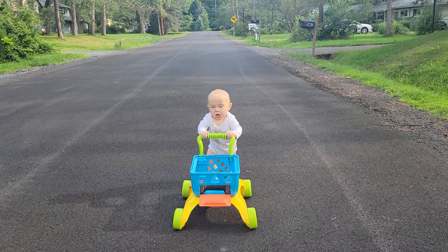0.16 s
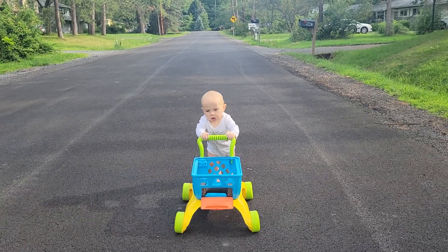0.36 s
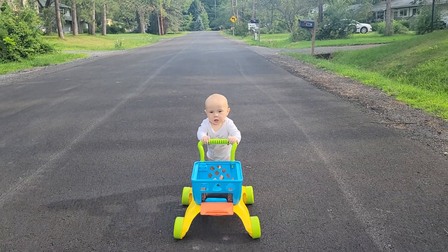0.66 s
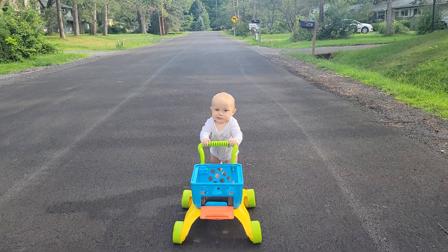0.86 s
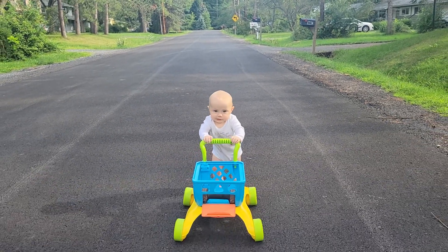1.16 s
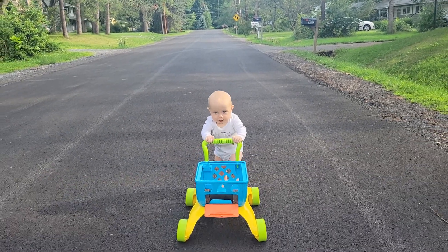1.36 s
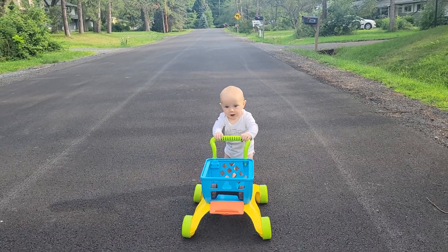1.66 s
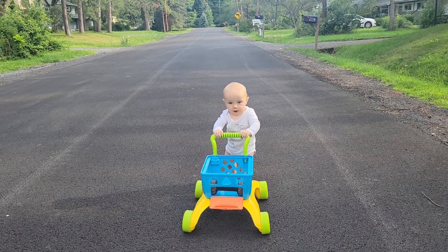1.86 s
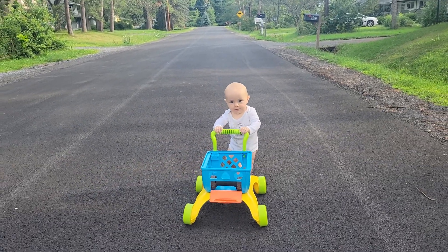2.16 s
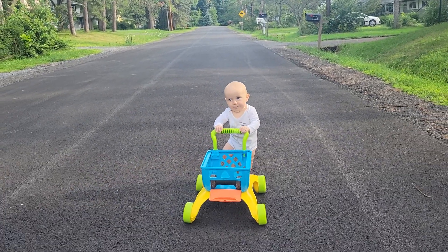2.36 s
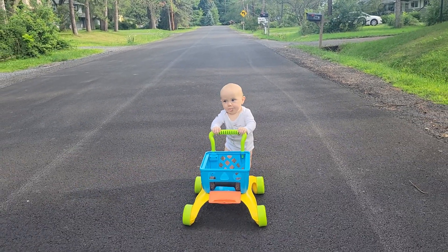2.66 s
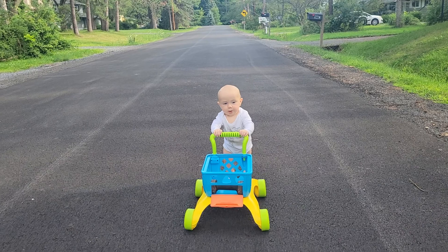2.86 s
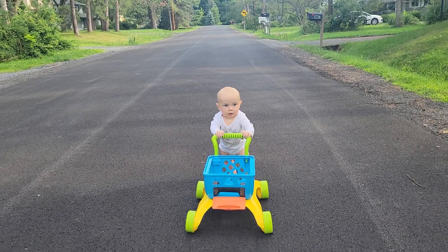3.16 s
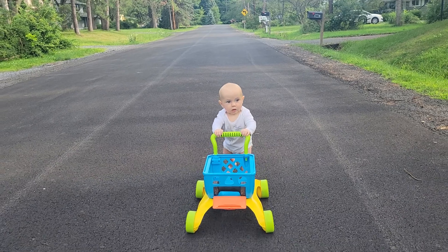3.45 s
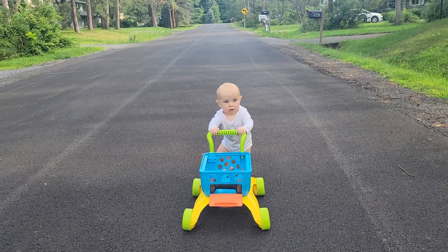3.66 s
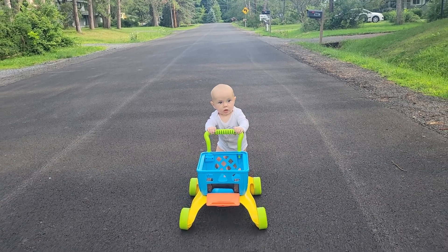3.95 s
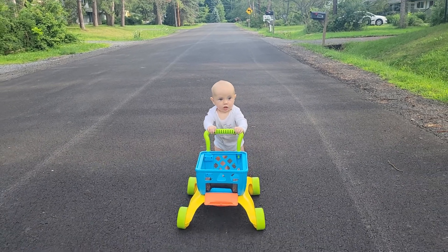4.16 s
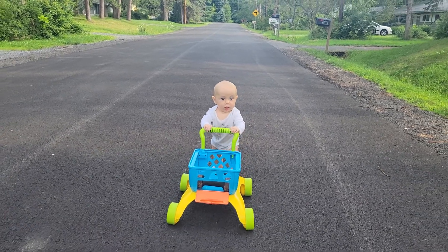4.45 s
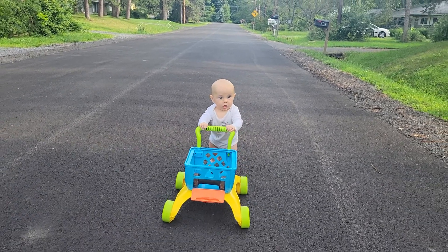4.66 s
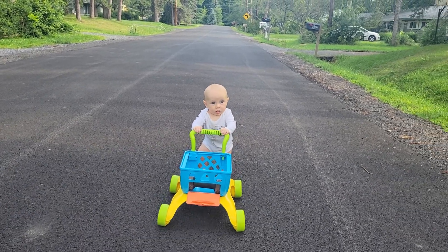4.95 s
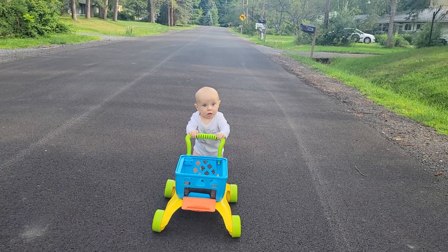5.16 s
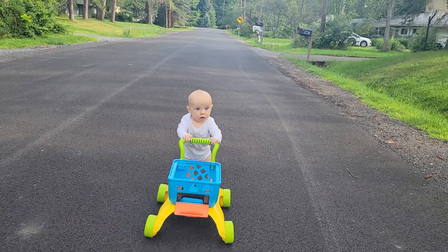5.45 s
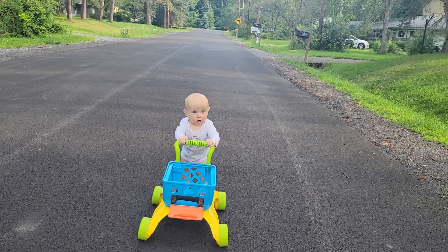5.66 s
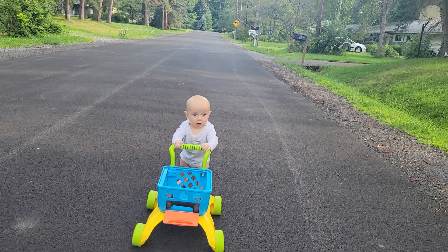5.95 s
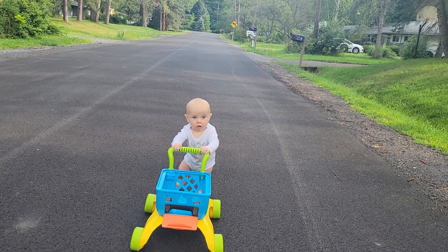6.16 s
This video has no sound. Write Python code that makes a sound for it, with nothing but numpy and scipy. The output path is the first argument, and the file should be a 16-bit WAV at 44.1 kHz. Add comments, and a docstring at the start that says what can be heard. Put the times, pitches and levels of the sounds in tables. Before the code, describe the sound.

Open air on a quiet residential street, stereo microphone near the cart. From 0 s a hollow plastic push cart rattles over coarse asphalt, with knocks clustered up to 0.8 s, the strongest at 0.75, and a deep hollow boom near 1.3. High pulsing crickets are clearest in the first second, then drop to a faint shimmer. A distant one-cylinder engine putters, surges at about 1.1 s, settles, swells again near 2.9 and falls to a slow chug at 3.3. Gritty sole scuffs come between 1.2 and 2.6 s, with a soft low thump at 2.2. Knocks return at 2.7, then crowd from 3.8 to 4.7 with crisp grit cracks and another soft thump. Scuffs follow at 4.2, 5.0 and 5.3. From 4.6 s the engine revs higher, becoming a strong low drone, loudest at the 6.3 s end, over sparse final rattles and low airy rumble.

```python
"""A hollow plastic push cart rolls over coarse asphalt: random impacts of grit and sharp blows excite its modes.
Some way off a one-cylinder engine putters and revs up, a harmonic series locked to the firing rate, with one echo.
Crickets trill in the verges as pulsed gliding tones, the far ones merged into bands of hiss; filtered noise is
the air of a quiet street. Grit cracks in treble bursts, soles scuff in gritty hiss, and soft thumps swing low."""
import sys
import numpy as np
from scipy import signal
from scipy.fft import rfft, irfft
from scipy.io import wavfile
from scipy.ndimage import uniform_filter1d

SR = 44100
rng = np.random.default_rng(int(sys.argv[2]) if len(sys.argv) > 2 else 0)


def wav_out(sig):
    """Save sig, one row per channel (or a flat mono array), as 16-bit PCM at SR to the path in sys.argv[1]."""
    wavfile.write(sys.argv[1], SR, np.round(np.clip(np.atleast_2d(sig).T, -1, 1) * 32767).astype(np.int16))


N = 278315


def gain_of(db):
    """Level law: amplitude ratio of a level in dB."""
    return 10 ** (np.asarray(db) / 20)


def evened(x):
    """Normalisation to unit root-mean-square."""
    return x / np.sqrt(np.mean(x ** 2) + 1e-20)


def read(points, hz):
    """Interpolation of a spectrum table on a logarithmic frequency axis."""
    f, value = np.transpose(points)
    return np.interp(np.log(hz + 1), np.log(f + 1), value)


def curves(rows):
    """Linear interpolation in time: every column of a table at sample rate."""
    s, *columns = np.transpose(rows)
    return [np.interp(np.arange(N) / SR, s, c) for c in columns]


def add(mix, s, sound):
    """Superposition: a sound joins the mix at s seconds, cut at the end of the mix."""
    part = mix[..., round(s * SR):][..., :sound.shape[-1]]
    part += sound[..., :part.shape[-1]]


def sides(db):
    """Interchannel level difference: left over right by db."""
    return gain_of([[db / 2], [-db / 2]])


def ring(x, hz, width):
    """Simple resonance: two poles, peak gain 1."""
    return signal.lfilter(*signal.iirpeak(hz, hz / width, SR), x)


# Modes of the hollow plastic cart: f/Hz, width/Hz, level/dB
CART_MODES = [(372, 130, -9), (443, 150, -9), (725, 63, -8), (798, 60, -1), (1066, 99, -4),
              (1657, 126, -12), (2330, 430, -22), (3530, 240, -27.5), (4900, 960, -22.5),
              (13100, 1100, -40.5)]


def cart(blows, fine, vary_db=0):
    """Modal superposition: broad blows excite the five low modes, fine ones the high modes."""
    modes = 0
    for k, (hz, width, db) in enumerate(CART_MODES):
        force = fine if k > 4 else blows
        # each impact favours other modes when vary_db is above 0
        favour = gain_of(vary_db * rng.standard_normal(blows.shape[1]))
        modes = modes + (-1) ** k * gain_of(db) * ring(force * favour, hz, width)
    return signal.lfilter(*signal.butter(2, 250, "high", fs=SR), modes, axis=1)


def spread(wheels):
    """Crosstalk by path difference: each wheel reaches the other microphone one sample later and duller."""
    far = signal.lfilter(*signal.butter(1, 3500, fs=SR), wheels[::-1])
    return (wheels + np.roll(far, 1, axis=1)) * sides(-1.6)


# Rattle of the wheels: t/s, level/dB
RATTLE_LEVEL = [(0.0, -59.5), (0.33, -43), (0.52, -56), (0.78, -41), (1.03, -56), (1.28, -40.5),
                (1.39, -62.5), (1.6, -43.5), (1.83, -79), (2.6, -49), (3.28, -54.5), (3.39, -44.5),
                (3.5, -60.5), (4.0, -50), (4.3, -55.5), (5.4, -63.5), (5.7, -50.5), (5.96, -60),
                (6.19, -50), (6.31, -72)]


def rattle(shake_db=-18, rise_s=0.004, fall_s=0.03):
    """Addition of powers: the run of the cart plus a short shake at every bump, shake_db relative to its blow."""
    t = np.arange(N) / SR
    power = gain_of(curves(RATTLE_LEVEL)[0]) ** 2
    for s, db, *_ in BUMPS:
        envelope_log = np.minimum((t - s) / rise_s, (s - t) / fall_s)
        power += gain_of(db + shake_db) ** 2 * np.exp(envelope_log * 2)
    return np.sqrt(power)


# Boom of the hollow basket, as gains on its resonances: t/s, upper note level/dB, deep note level/dB
BASKET_BOOM = [(.4, -0.5, -33), (.6, 7, -26.5), (1.27, 3.5, 3.5), (1.4, 6.5, -10), (2.1, -3, -24)]


def rolling(jolt_db=2.8, vary_db=4, impacts_per_s=1200):
    """Random impact excitation: stones and grit of uneven size tick two wheels apart, in shared jolts."""
    jolts = evened(uniform_filter1d(uniform_filter1d(rng.standard_normal(N), size=300), size=300))
    shape = (2, 2, N)  # stones and grit, left and right wheel, samples
    size_db = 3.6 * np.minimum(rng.exponential(1, shape), 4)
    size = gain_of(size_db) * rng.standard_normal(shape)
    landed = rng.random(shape) < impacts_per_s / SR
    stones, grit = size * landed * gain_of(jolt_db * jolts)
    upper, deep = gain_of(curves(BASKET_BOOM))
    upper_note = upper * ring(ring(stones, 670, 90), 670, 90)
    deep_note = deep * ring(stones, 345, 25)
    wheels = cart(stones, grit, vary_db)
    # the rattle level holds for the wheels alone; the basket comes on top
    return spread(wheels + upper_note + deep_note) * rattle() / np.std(spread(wheels))


# Engine speed: t/s, firing rate f/Hz, mean level/dB
ENGINE_RUN = [(0.0, 35.4, -44.5), (0.84, 29.4, -41.5), (1.1, 35.0, -31), (1.26, 39.2, -32),
              (1.65, 33.6, -37), (1.88, 30.1, -39.5), (2.64, 28.9, -39), (2.93, 32.6, -32),
              (3.12, 29.0, -34.5), (3.3, 24.5, -40), (3.7, 25.5, -38), (4.38, 25.7, -33.5),
              (4.63, 27.6, -35), (5.0, 38.7, -26), (5.2, 44.4, -26), (5.42, 48.6, -25.5), (5.9, 46.5, -24),
              (6.19, 55.8, -23), (6.31, 58.4, -20)]
# Exhaust response: f/Hz, relative level/dB
EXHAUST_RESPONSE = [(20, -41), (48, -17), (78, 0), (105, 2), (145, 1), (190, -10.5), (221, -19.5),
                    (243, -14), (290, -36), (400, -52)]
# Bark of the exhaust, a tilt about 120 Hz: t/s, slope/(dB per octave)
EXHAUST_BARK = [(0, 4), (.85, 2), (2.3, -2), (3.4, -3), (4.5, -8.5), (5.3, 0.5)]


def engine(uneven_db=1.3, jitter=.009, skew=.4):
    """Fourier synthesis: equal-phase orders make one pressure pulse a firing, of uneven strength and period."""
    # computed at an eighth of the sample rate
    hz, level_db, bark = (c[::8] for c in curves(ENGINE_RUN) + curves(EXHAUST_BARK))
    wobble = evened(uniform_filter1d(rng.standard_normal(len(hz)), size=200))
    firings = np.cumsum(hz * (1 + jitter * wobble)) * 8 / SR
    count = N // SR * 70  # more than the firings that occur
    strength = np.interp(firings, np.arange(count), rng.standard_normal(count))
    order = np.arange(1, 15)[:, None]
    heights = gain_of(read(EXHAUST_RESPONSE, order * hz) + bark * np.log2(order * hz / 120))
    heights /= np.sqrt((heights ** 2).sum(0) / 2)  # unit power at every speed
    pulses = (heights * np.cos(2 * np.pi * order * firings + skew)).sum(0)
    pulses *= gain_of(level_db + uneven_db * strength)
    return signal.resample_poly(pulses, 8, 1, padtype="edge")[:N]


def street(sound, echo_s=0.02038, echo_db=-13):
    """Specular reflection: one echo off the house fronts, a little from the right."""
    echo = np.zeros(N)
    add(echo, echo_s, sound)
    return sound + gain_of(echo_db) * echo * sides(-1.1)


# Spectrum of the air: f/Hz, relative spectral level/dB
AIR_SPECTRUM = [(20, -8), (55, 3.5), (200, -10.5), (320, -26.5), (800, -27.5), (1700, -31.5), (3200, -42.5),
                (6500, -60.5), (16000, -52)]
# Left-right likeness of the air: f/Hz, correlation
AIR_LIKENESS = [(30, .2), (150, .5), (800, .7), (3000, 0)]


def air(level_db=-41.5, patchy_db=.7):
    """Short-time Fourier synthesis: far traffic and leaves as random spectra with drifting patches."""
    frames, hz = N // 512 + 5, np.fft.rfftfreq(2048, 1 / SR)
    a, b, c, d, patches = rng.standard_normal((frames, 1025, 5)).T
    patches = uniform_filter1d(uniform_filter1d(patches, size=20, axis=0), size=8, axis=1)
    same = np.clip(read(AIR_LIKENESS, hz), -1, 1)[:, None]
    left = a + 1j * b
    right = same * left + np.sqrt(1 - same ** 2) * (c + 1j * d)
    spectra = np.array([left, right])
    spectra *= gain_of(read(AIR_SPECTRUM, hz)[:, None] + patchy_db * evened(patches))
    return gain_of(level_db) * evened(signal.istft(spectra, nperseg=2048, noverlap=1536)[1][:, :N])


# Near crickets: f/Hz, pulse rate/(1/s), first pulse t/s, pulse length/s, early level/dB, later level/dB,
# left-right difference/dB (levels before this difference and the uneven strokes)
NEAR_CRICKETS = [(8060, 16.1, 0.021, 0.024, -60, -73.5, -4.5), (8350, 16.3, .045, 0.024, -65.5, -78, 0),
                 (7720, 16.0, .049, 0.031, -63.5, -75.5, -9), (8850, 18.6, 0.0037, 0.017, -70, -76, 7)]
# Far crickets: f/Hz, width of each of two resonances/Hz, early level/dB
FAR_CRICKETS = [(7990, 1030, -60.5), (5450, 1400, -68.5)]
# The microphones leave the near crickets: t/s, share of the later level
LEAVING = [(.85, 0), (1.05, 0.6), (6.31, 1)]


def crickets(uneven_db=2, blur_hz=60, far_fade_db=-3, glide_hz=-250):
    """Pulsed frequency glides: each wing stroke slides down in pitch; far strokes merge into resonant noise."""
    t, out = np.arange(N) / SR, np.zeros((2, N))
    later = curves(LEAVING)[0]
    for hz, rate, first, pulse, db, end_db, pan_db in NEAR_CRICKETS:
        strokes = rate * (t - first) + 1
        phase = np.minimum(strokes % 1 / (rate * pulse), 1)  # 0 to 1 in a stroke, then silent at 1
        waver = evened(uniform_filter1d(rng.standard_normal(N), size=100))
        pitch = hz + glide_hz * (phase - .5) + blur_hz * waver
        tone = np.sin(2 * np.pi * np.cumsum(pitch) / SR)
        force_db = uneven_db * rng.standard_normal(200)[strokes.astype(int)]
        level = gain_of(db + (end_db - db) * later + force_db)
        song = evened(tone * np.sin(np.pi * phase) ** 2) * level
        # the two microphones hear it with unlike delays
        out += np.array([song, np.roll(song, rng.integers(-8, 8))]) * sides(pan_db)
    for hz, width, db in FAR_CRICKETS:
        hiss = ring(ring(rng.standard_normal((2, N)), hz, width), hz, width)
        out += gain_of(db + far_fade_db * later) * evened(hiss)
    return out


# Bumps: t/s, peak level of the blow/dB, struck part f/Hz, level of the snap over the blow/dB
BUMPS = [(0.022, -34.5, 852, -24), (0.178, -34.5, 980, 3.5), (0.242, -31, 782, 1), (.304, -34.5, 815, -14),
         (0.339, -30.5, 740, -2.5), (.605, -32.5, 640, -22), (0.634, -28, 660, 5.5),
         (0.749, -21.5, 775, -3.5), (.773, -42, 680, -20), (1.164, -36.5, 750, -4), (1.462, -34, 1080, -3),
         (1.56, -34, 705, -16), (1.605, -28, 710, -7), (1.663, -29.5, 740, -23), (2.095, -47, 770, 6),
         (2.387, -38.5, 840, -3), (2.676, -25, 1055, -6.5), (2.713, -30.5, 820, -6), (2.811, -29, 880, -2),
         (2.839, -32, 790, -3), (3.163, -36, 820, -9), (3.199, -29, 800, -16.5), (3.37, -37, 800, -0.5),
         (3.762, -40.5, 1040, 4.5), (3.849, -27.5, 800, -4.5), (3.893, -31, 850, -9),
         (3.972, -32, 797.5, -5), (3.984, -28, 805, -5.5), (4.035, -31.5, 800, -5.5), (4.139, -30, 794, -8),
         (4.176, -35.5, 1090, -13), (4.44, -29, 760, -1.5), (4.485, -26, 720, -8.5), (4.525, -46, 900, -4),
         (4.592, -27.5, 750, -28), (4.628, -42, 849, -9), (4.642, -36.5, 800, -16),
         (4.688, -24.5, 860, -9.5), (4.994, -32.5, 1130, -9.5), (5.2, -32, 830, -4),
         (5.656, -33.5, 980, -1.5), (5.807, -41, 1110, -4), (6.163, -32.5, 830, -5)]


def knocks(part_db=13, width=120, chatter_s=.006, chatter_doubles_db=16):
    """Impulse response: a sharp blow and some chatter ring the struck part over the rest of the cart."""
    out, t = np.zeros((2, N)), np.arange(3000) / SR
    for s, db, hz, snap in BUMPS:
        # a blow with more snap chatters longer
        contact = np.exp(-t / (chatter_s * 2 ** (snap / chatter_doubles_db)))
        chatter = rng.standard_normal((2, len(t))) * (rng.random(len(t)) < .06) * contact
        chatter[0, 0] = 3  # the blow itself, on the left wheel
        soft = uniform_filter1d(chatter, size=14)
        body = cart(soft, 0 * soft) + gain_of(part_db) * ring(soft, hz, width)
        top = cart(0 * chatter, chatter)
        top *= gain_of(snap) * abs(body).max() / abs(top).max()
        body_peak = abs(spread(body).mean(0)).max()
        add(out, s, gain_of(db) * spread(body + top) / body_peak)
    return out


# Grit cracking under a wheel: t/s, peak level of the left-right mean/dB
GRIT_CRACKS = [(0.353, -45), (0.635, -46), (1.188, -43), (2.474, -47), (3.0012, -42), (3.847, -40),
               (3.988, -43), (4.4393, -41), (5.658, -48), (6.163, -46)]


def cracks(low_hz=5000):
    """Transient noise: short dry bursts of treble with a fast rise and an exponential decay."""
    out, t = np.zeros((2, N)), np.arange(1500) / SR
    for s, db in GRIT_CRACKS:
        grains = rng.standard_normal((2, len(t))) * (rng.random(len(t)) < .4)
        burst = spread(grains) * (1 - np.exp(-t / .002)) * np.exp(-t / .009)
        burst = signal.lfilter(*signal.butter(2, low_hz, "high", fs=SR), burst) * sides(2.3)
        add(out, s, gain_of(db) * burst / abs(burst.mean(0)).max())
    return out


# Soles dragged on the road: t/s, length/s, level before the taper/dB, scrape f/Hz, treble slope/(dB per octave)
SOLE_SCUFFS = [(1.165, .17, -49, 1630, -7.5), (1.559, 0.097, -45.5, 2020, -12.5),
               (1.859, 0.073, -47, 1480, -3), (1.99, 0.027, -51, 1630, -9.5), (2.234, .17, -49.5, 1930, -6),
               (2.556, 0.064, -51, 2200, 0), (4.182, 0.079, -47, 1470, -2.5), (5.032, 0.11, -54, 2030, -2),
               (5.265, 0.074, -47.5, 1470, -1.5)]
# Spectrum of a sole on grit: f/Hz, relative spectral level/dB
SOLE_SPECTRUM = [(600, -66), (1000, -15), (2600, -14), (3000, -22.5), (3600, -14), (5500, -14.5),
                 (15500, -32.5)]


def scuffs(edge=.7, scrape_db=10, scrape_width_hz=120):
    """Friction noise: rubber on grit gives a short gritty hiss with one scrape band."""
    out, shape = np.zeros((2, N)), (2, 8192)
    hz = np.fft.rfftfreq(shape[1], 1 / SR)
    for s, length, db, scrape_hz, tilt in SOLE_SCUFFS:
        n = round(length * SR)
        grit = spread(rng.standard_normal(shape) * gain_of(3 * rng.standard_normal(shape)))
        band_db = scrape_db * np.exp(-((hz - scrape_hz) / scrape_width_hz) ** 2)
        tilt_db = tilt * np.log2(hz / 2000 + 0.089)  # the offset levels the slope off in the bass
        colour_db = read(SOLE_SPECTRUM, hz) + band_db + tilt_db
        lumps = evened(uniform_filter1d(rng.standard_normal(shape[1]), size=300))
        hiss = evened(irfft(rfft(grit * gain_of(2 * lumps)) * gain_of(colour_db)))
        add(out, s, gain_of(db) * hiss[:, :n] * signal.windows.tukey(n, edge))
    return out


# Soft low thumps at the microphones: centre t/s, peak level before the left-right difference/dB, f/Hz
LOW_THUMPS = [(2.229, -20.5, 76), (3.802, -25, 64.84)]


def thumps(cycles=0.51):
    """Gaussian wave packet: a couple of low swings under a bell-shaped envelope, stronger on the left."""
    out, t = np.zeros((2, N)), np.arange(-3000, 3000) / SR
    for s, db, hz in LOW_THUMPS:
        swing = -np.cos(2 * np.pi * hz * t) * np.exp(-(t * hz / cycles) ** 2)
        add(out, s + t[0], gain_of(db) * swing * sides(11.0))
    return out


def scene():
    """Linear superposition of all sources; only the engine has the echo."""
    continuous = rolling() + street(engine()) + air() + crickets()
    return continuous + knocks() + cracks() + scuffs() + thumps()


def record(dry, edge_hz=15700):
    """Band limitation: a linear-phase low-pass, after a short fade for a click-free end."""
    fade = np.minimum(np.arange(N)[::-1] / 200, 1)
    low_pass = signal.firwin(1023, edge_hz, window=("kaiser", 9), fs=SR)
    return signal.oaconvolve(dry * fade, low_pass[None], "same")


dry = scene()
out = record(dry)
wav_out(out)
```